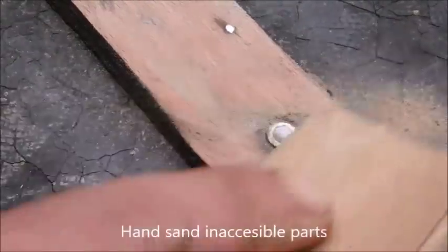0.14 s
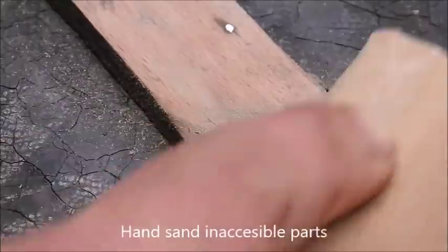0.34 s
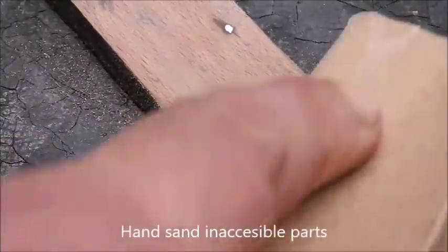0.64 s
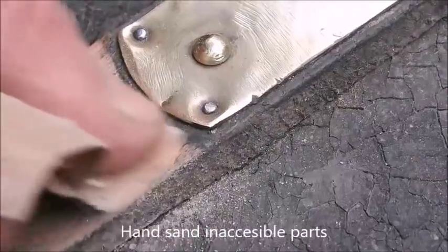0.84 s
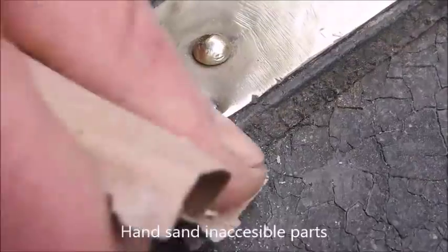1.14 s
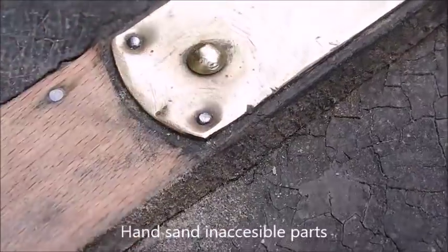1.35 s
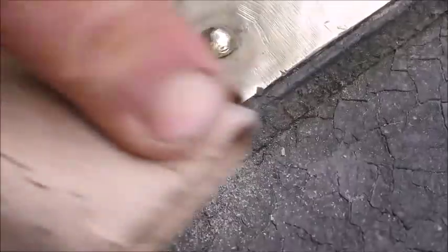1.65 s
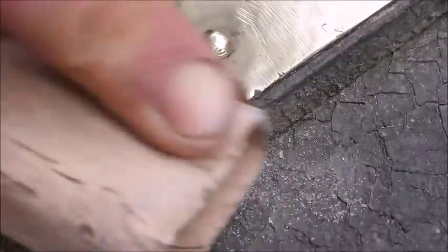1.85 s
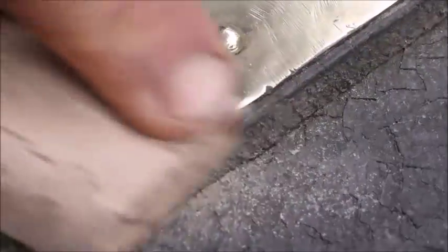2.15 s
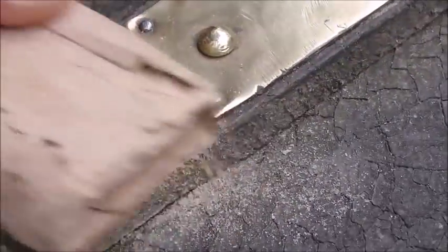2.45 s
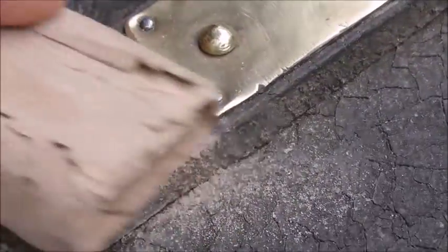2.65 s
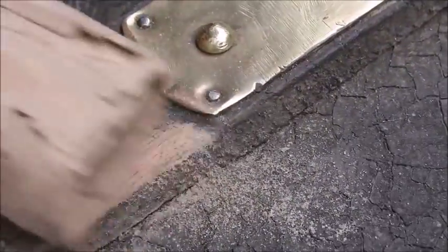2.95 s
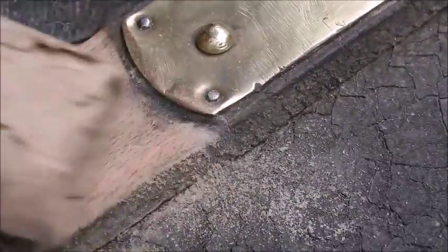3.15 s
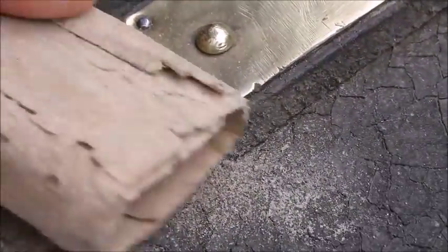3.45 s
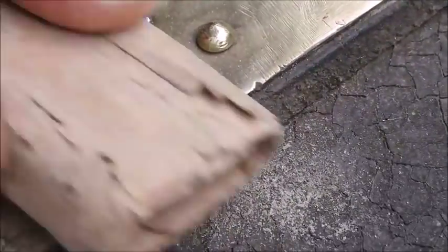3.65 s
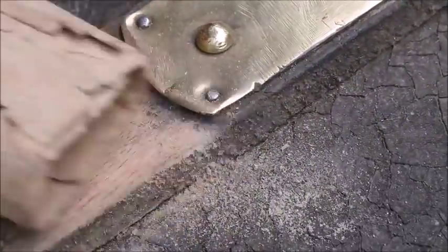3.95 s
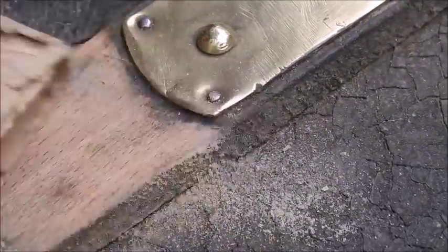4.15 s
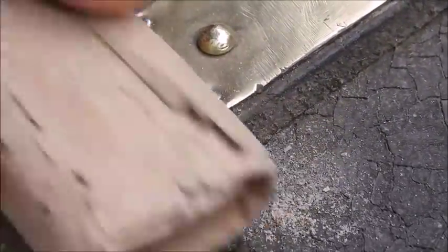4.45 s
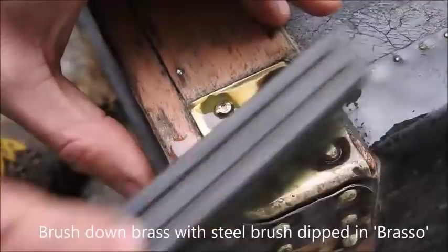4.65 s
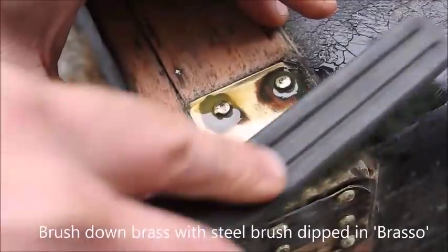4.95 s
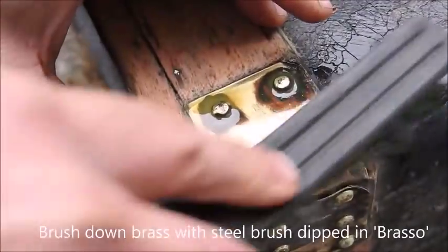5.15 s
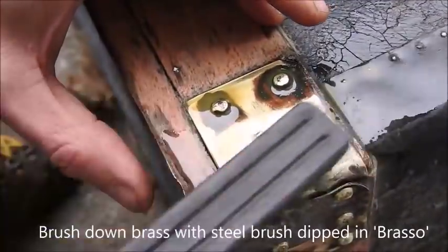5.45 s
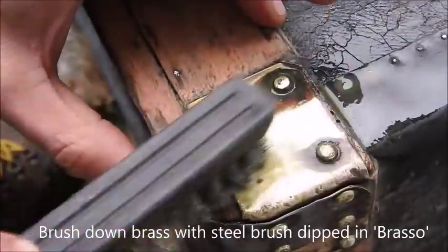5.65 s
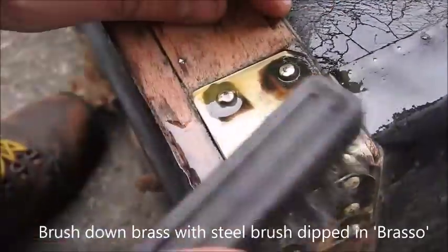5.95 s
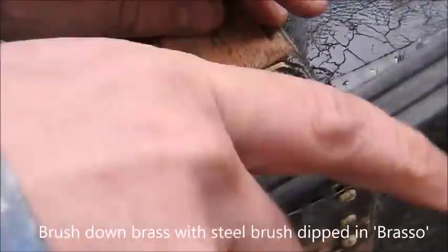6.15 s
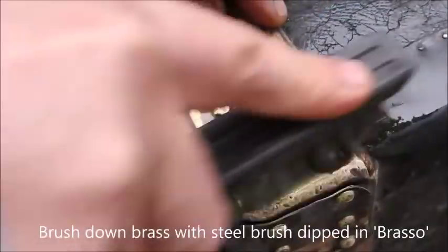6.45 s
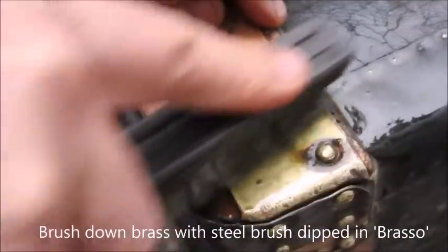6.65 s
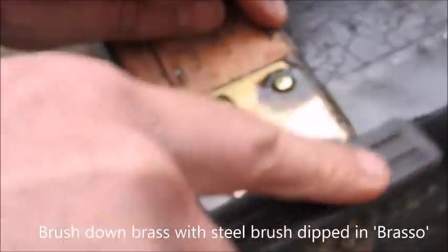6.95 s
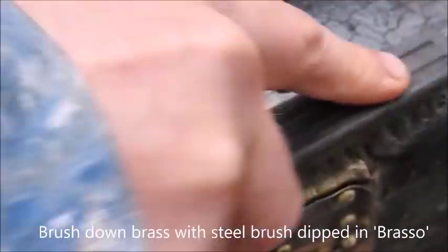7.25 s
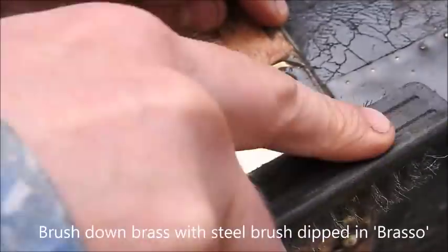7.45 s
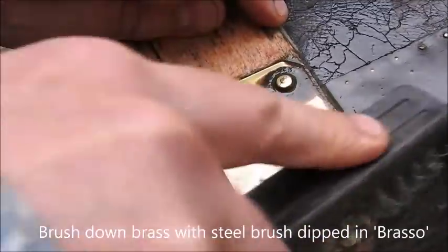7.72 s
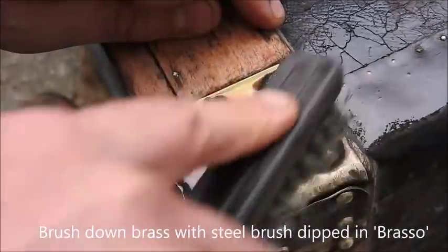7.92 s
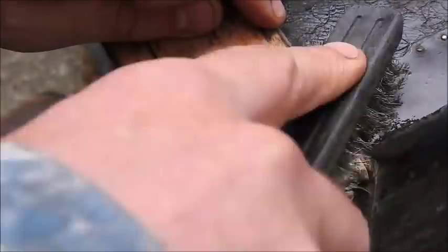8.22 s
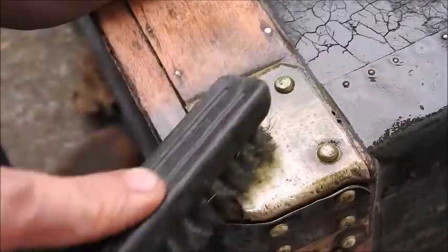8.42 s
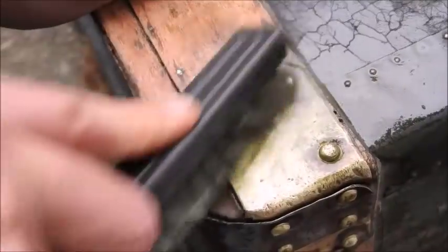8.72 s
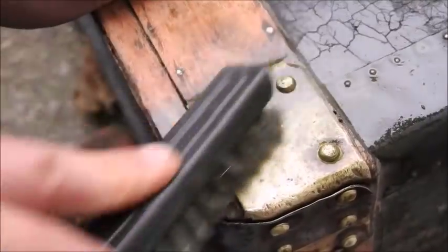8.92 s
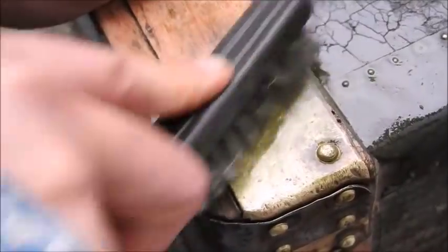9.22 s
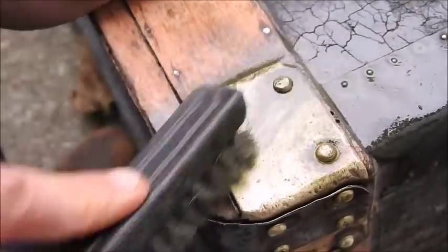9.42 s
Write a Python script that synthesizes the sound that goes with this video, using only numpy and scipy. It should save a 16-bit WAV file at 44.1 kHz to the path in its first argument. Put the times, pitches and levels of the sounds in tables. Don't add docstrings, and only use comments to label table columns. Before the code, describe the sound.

Fast dry sandpaper strokes rasp on hollow wood, with knocks and paper crinkle, then a wet steel brush scrubs brass briskly in a quiet yard.

```python
import sys
import numpy as np
from scipy import signal
from scipy.fft import rfft, irfft, next_fast_len
from scipy.io import wavfile
from scipy.ndimage import uniform_filter1d

SR = 44100
rng = np.random.default_rng(int(sys.argv[2]) if len(sys.argv) > 2 else 0)


def nominal_scale(level):
    x = np.asarray(level, float) / 20
    return 10 ** x


def int16_out(signal):
    q = np.round(np.clip(np.atleast_2d(signal).T, -1, 1) * 32767)
    wavfile.write(sys.argv[1], SR, q.astype(np.int16))


N = 422474
SECONDS = np.arange(N) / SR

SPOTS = [
    0,
    .785,
    1.55,
    2.44,
    4.62,
    5.58,
    6.05,
    8.31,
]
BRUSH_SPOT, EDGE_SPOT = 4, 7


def hand():
    # start in seconds, count of push-and-pull cycles, grit in dB, trunk in dB.
    paper_runs = [(.037, 4, -30.5, -32), (.356, 3, -30.5, -35), (.591, 1, -31.5, -35),
                  (.664, 1, -35, -40.5), (.799, 2, -39.5, -31), (.932, 1, -40.5, -28), (0.997, 2, -40, -30),
                  (1.122, 1, -37, -27), (1.603, 1, -36.5, -41), (1.665, 2, -34.5, -40.5),
                  (1.812, 1, -34, -39.5), (1.886, 1, -36.5, -43), (1.957, 3, -36.5, -40),
                  (2.162, 1, -36.5, -40), (2.456, 1, -35, -40), (2.527, 3, -39.5, -43),
                  (2.734, 2, -37, -40), (2.872, 3, -34, -39.5), (3.068, 1, -36, -39),
                  (3.137, 2, -37.5, -43), (3.273, 2, -36, -37), (3.406, 2, -39.5, -42.5),
                  (3.609, 3, -39.5, -44.5), (3.806, 3, -39.5, -41), (4.006, 1, -40.5, -44.5),
                  (4.077, 2, -38, -40), (4.22, 3, -39.5, -42), (4.422, 2, -37, -42), (4.562, 1, -37, -43.5)]
    # start in seconds, count of cycles, grit in dB.
    brush_runs = [(4.668, 5, -41.5), (4.998, 5, -40), (5.329, 1, -39), (5.393, 2, -39.5), (5.53, 1, -40),
                  (5.59, 1, -40.5), (5.659, 3, -37), (5.856, 1, -35.5), (6.274, 2, -45.5),
                  (6.409, 2, -42.5), (6.546, 1, -41), (6.608, 3, -41.5), (6.811, 2, -41), (6.936, 1, -42.5),
                  (7.159, 1, -41), (7.225, 3, -40), (7.423, 1, -44.5), (7.493, 1, -45), (7.56, 2, -43),
                  (7.695, 3, -44), (7.907, 1, -44), (7.977, 1, -43), (8.047, 2, -44), (8.182, 2, -43.5),
                  (8.361, 2, -39.5), (8.498, 2, -39.5), (8.636, 5, -38.5), (8.99, 2, -37.5),
                  (9.129, 5, -36), (9.494, 1, -37)]
    # start in seconds, grit in dB, place of top speed 0-1, trunk in dB.
    paper_touches = [(0, -33.5, 0, -35.5), (.74, -33.5, 0.94, -34), (.775, -40, .29, -42),
                     (1.184, -35, .63, -25), (1.217, -48, 0.37, -42), (1.241, -53, 0.6, -61),
                     (1.3, -50, 0.3, -35), (1.338, -53, 0.26, -41), (1.376, -52, 0.8, -40),
                     (1.4, -45.5, 0.47, -40.5), (1.44, -53, 0.3, -62), (1.467, -56.5, .27, -72),
                     (1.562, -50.5, 0.3, -64), (2.235, -48, 0.67, -44), (2.283, -48.5, 0.45, -57),
                     (2.324, -57, .46, -60), (2.35, -51, 0.34, -53), (2.411, -53.5, 0.6, -52),
                     (2.438, -53.5, .6, -60), (3.543, -44.5, 0.58, -40.5), (3.566, -60, .5, -57),
                     (3.586, -49, 0.5, -54)]
    # start in seconds, grit in dB, place of top speed 0-1.
    brush_touches = [(4.622, -43, 0.3), (4.636, -44.5, 0.5), (5.929, -69, 0.3), (6.089, -45, 0),
                     (6.115, -53.5, 0.4), (6.219, -54.5, 0.6), (7.008, -49.5, 0.3), (7.037, -62, 0.44),
                     (7.069, -42.5, 0.68), (7.128, -46, 0.44), (8.325, -41, 0.3)]
    # share of the push 0-1, place of top speed in push 0-1 and in pull 0-1,
    # how much softer the pull is in grit dB and in trunk dB.
    gait = [(.49, .56, 0.44, 0.7, 2), (0.48, 0.61, 0.46, 2.5, 11.5), (0.47, 0.63, 0.44, 3, 3.5),
            (0.5, 0.61, 0.47, 1.3, 3.5), (0.59, 0.51, 0.3, 4.5, -2.5), (0.52, 0.56, 0.3, 3, 2),
            (0.54, 0.55, 0.41, 2, 0.1), (0.49, 0.64, 0.45, 2.5, 1.3)]
    uneven_db, uneven_place = 0.65, 0.057

    runs = np.array(paper_runs + [(*row, 0) for row in brush_runs])
    rows = paper_touches + [(*row, 0) for row in brush_touches]
    starts = np.sort([row[0] for row in rows] + list(runs[:, 0]) + [N / SR])
    for s, count, *_ in runs:
        cycle = (starts[starts > s][0] - s) / round(count)
        share, push, pull, grit_loss_db, trunk_loss_db = gait[np.searchsorted(SPOTS, s) - 1]
        for start in s + cycle * np.arange(round(count)):
            grit_db = np.interp(start, runs[:, 0], runs[:, 2])
            trunk_db = np.interp(start, runs[:, 0], runs[:, 3])
            rows.append((start, grit_db, push, trunk_db))
            rows.append((start + share * cycle, grit_db - grit_loss_db, pull, trunk_db - trunk_loss_db))
    rows = np.array(sorted(rows))
    chance = rng.standard_normal(rows.shape) * [0, uneven_db, uneven_place, 1.84 * uneven_db]
    return (rows + chance).T


TURNS, GRIT_DB, PLACE, TRUNK_DB = hand()
TURNS = np.r_[0, TURNS[1:]]
PAPER_STROKES = np.searchsorted(TURNS, SPOTS[BRUSH_SPOT])


def by_tool(paper, brush):
    return np.repeat([paper, brush], [PAPER_STROKES, len(TURNS) - PAPER_STROKES])


def strokes(level_db, turn_db, lean_db, skew, point):
    k = np.searchsorted(TURNS, SECONDS, side="right") - 1
    done = (SECONDS - TURNS[k]) / np.diff(TURNS, append=N / SR)[k]
    top = np.clip(.5 + skew * (PLACE[k] - .5), .08, .92)
    rise_and_fall = np.clip(np.minimum(done / top, (1 - done) / (1 - top)), 0, 1)
    arc = np.sin(np.pi / 2 * rise_and_fall) ** point[k]
    own_stop_db = level_db - turn_db - lean_db * (PLACE - .5)
    stop_db = np.minimum(own_stop_db, np.roll(level_db, 1) - 9.0)
    turn = np.interp(SECONDS, TURNS, nominal_scale(stop_db))
    return turn + (nominal_scale(level_db)[k] - turn) * arc


def at_hz(points, hz):
    return np.interp(np.log(hz + 1), np.log(np.array(points)[:, 0]), np.array(points)[:, 1])


def resonance(x, hz, width):
    r = np.exp(-np.pi * width / SR)
    top = np.array([1, 0, -1]) * (1 - r * r) / 2
    return signal.lfilter(top, [1, -2 * r * np.cos(2 * np.pi * hz / SR), r * r], x, axis=-1)


def decaying(x, t60):
    return signal.lfilter([1], [1, -nominal_scale(-60 / (t60 * SR))], x)


def grains(per_s, spread_db, channels):
    sizes = nominal_scale(spread_db * np.minimum(rng.exponential(1, (channels, N)), 5))
    draw = rng.uniform(-1, 1, (channels, N))
    shower = sizes * np.sign(draw) * (abs(draw) < per_s / SR)
    return shower / shower.std()


def clicks(events):
    out, rows = np.zeros(N), np.array(events)
    out[(rows[:, 0] * SR).astype(int)] = nominal_scale(rows[:, 1])
    return out


def coloured(x, spectrum, tilt_db=0, ripple_db=0):
    size = next_fast_len(x.shape[1])
    hz = np.arange(size // 2 + 1) * SR / size
    ripple = np.interp(hz, np.linspace(0, SR / 2, num=60), rng.standard_normal(60))
    gain = nominal_scale(at_hz(spectrum, hz) + tilt_db * np.log2((hz + 1) / 8000) + ripple_db * ripple)
    gain = gain / np.sqrt(np.mean(gain ** 2 * (hz > 3000) * (hz < 15000)))
    return irfft(rfft(x, size) * gain, size)[:, :x.shape[1]]


def yard():
    # frequency in Hz, density in dB per Hz.
    spectrum = [(140, -13), (290, -1.5), (750, -2.5), (1300, -13.5), (5000, -15.5), (8000, -19),
                (15000, -22)]
    wash = coloured(rng.standard_normal((2, N)), spectrum)
    return nominal_scale(-54.5 - 1.9 * (SECONDS < SPOTS[BRUSH_SPOT])) * wash / wash.std()


def squeak():
    # start in seconds, end in seconds, frequency in Hz, level in dB.
    whistle = (5.668, 5.712, 9370, -38)
    start, end, hz, db = whistle
    swell = np.sin(np.pi * np.clip((SECONDS - start) / (end - start), 0, 1))
    return nominal_scale(db) * swell * np.sin(2 * np.pi * hz * SECONDS) * [[1], [.3]]


def flicks():
    # start in seconds, peak in dB, frequency in Hz, t60 in seconds.
    crinkles = [(1.262, -37.5, 7300, .1), (1.3461, -27, 13200, .015), (1.358, -34, 11000, .015),
                (1.3895, -31, 12400, .025), (1.406, -32, 13000, .02), (1.4144, -24, 14800, .06),
                (1.4768, -36, 12200, .03), (1.4965, -35, 11800, .025), (1.5706, -35, 6750, 0.072),
                (1.576, -34, 13500, .04), (1.613, -29, 11500, 0.045)]
    # time in seconds, peak in dB.
    bristle_flicks = [(4.6924, -40), (4.7624, -30), (4.8189, -29), (4.8853, -27), (4.9506, -34),
                      (5.019, -27), (5.0848, -27), (5.1527, -27), (5.2165, -29), (5.2854, -32),
                      (5.3497, -28), (5.4146, -27), (5.4819, -27), (5.5428, -28)]
    lead_s, width_hz = .007, 1400
    bursts = crinkles + [(s - lead_s, db - .5, 14700, .08) for s, db in bristle_flicks]
    out, t = np.zeros((2, N)), np.arange(SR // 10) / SR
    for s, db, hz, t60 in bursts:
        noise = rng.standard_normal((2, len(t)))
        burst = resonance(resonance(noise, hz, width_hz), hz, 2 * width_hz)
        envelope = nominal_scale(db - 4.0 - 60 * t / t60) * np.minimum(t / t60 / .06, 1)
        out[:, int(s * SR):int(s * SR) + len(t)] += burst / burst.std() * envelope
    return out


def thud():
    # start in seconds, frequency in Hz, t60 in seconds, level in dB.
    drop_rings = [(6.0915, 774, 0.026, -19.5), (6.0915, 974, 0.041, -28), (6.0905, 1230, 0.052, -27),
                  (6.0903, 1564, 0.059, -33.5), (6.0915, 2400, 0.033, -33.5), (6.097, 286, 0.12, -26.5),
                  (6.097, 416, .09, -34), (6.096, 523, 0.078, -29), (6.098, 1990, .1, -43.5),
                  (6.0888, 2020, 0.01, -30), (6.104, 415, .03, -24.5), (6.114, 573, 0.044, -33),
                  (6.132, 390, .05, -38), (6.135, 1500, .08, -51)]
    # start in seconds, frequency in Hz, t60 in seconds,
    # level in dB.
    rap_rings = [(.889, 1440, .05, -30), (.956, 800, .06, -26), (1.019, 1460, 0.053, -20.5),
                 (1.079, 808, .08, -27), (1.08, 1440, 0.051, -29), (1.139, 813, 0.063, -25),
                 (1.203, 820, 0.056, -18), (1.302, 358, .12, -30.5), (1.307, 600, .06, -26.5),
                 (1.308, 1890, 0.032, -28.5), (1.308, 2890, .02, -33), (1.312, 2300, .03, -32),
                 (1.316, 330, .1, -35), (1.347, 704, .05, -30.5), (1.358, 1800, .04, -36),
                 (1.36, 560, 0.065, -35), (1.391, 480, .04, -32), (1.401, 795, 0.037, -33),
                 (1.417, 900, 0.046, -28), (1.419, 421, 0.065, -32)]
    out = np.zeros(N)
    for s, hz, t60, db in drop_rings + rap_rings:
        since = SECONDS - s
        decay = nominal_scale(db - 60 * np.abs(since) / t60)
        out += decay * np.sin(2 * np.pi * hz * np.maximum(since, 0)) * (since > 0)
    return out


def trunk():
    # frequency in Hz, width in Hz.
    modes = [(165, 56), (230, 76), (293, 21.9), (385, 54), (460, 56), (600, 74), (715, 77), (815, 61),
             (1010, 186), (1435, 62), (1950, 260)]
    # one spot, a gain in dB per mode in their order.
    coupling = [(-30, -18.5, -4.5, -2.5, -1, -9, -9.5, -10, -13, -11, -17),
                (-23, -17.5, -7.5, -8.5, -8, -16, -14, -2.5, -12, -4, -14),
                (-18.5, -14.5, 1, -8.5, -14, -12, -14.5, -6.5, -14, -10.5, -22),
                (-20.5, -12.5, 0, -7.5, -13, -9, -12, -6, -13, -6, -18.5),
                (-20, -23, 1.5, -12.5, -6.5, -8, -7, -4, -14.5, -10.5, -24),
                (-21, -20, 0, -11.5, -5, -10, -6, -1, -13.5, -20, -22.5),
                (-19.5, -14.5, 1.5, -13, -7.5, -12, -9.5, -7.5, -16, -12, -20.5),
                (-24, -18.5, 1.5, -13.5, -10, -14.5, -20, -12, -17, -12, -25)]
    # time in seconds, trunk in dB.
    brush_drum = [(4.63, -48), (5.9, -48), (6.3, -45), (6.55, -50), (6.9, -52), (7.35, -47), (7.7, -47),
                  (8.3, -51.5), (9.58, -50.5)]
    # time in seconds, peak in dB, boom in dB.
    knocks = [(0.806, -20.5, -53), (0.821, -20.5, -44), (0.872, -31, -45), (0.889, -20, -40),
              (0.938, -20, -40), (0.956, -17, -35), (1.002, -17, -36), (1.02, -13.5, -45),
              (1.063, -18.5, -38), (1.079, -16, -36), (1.125, -22, -36), (1.139, -13, -39),
              (1.189, -22, -36), (1.203, -12.5, -39), (1.307, -23, -33), (1.346, -32, -39),
              (1.384, -30, -40), (1.405, -24.5, -36), (1.417, -25, -38), (2.19, -20.5, -42),
              (2.265, -27.5, -48), (2.299, -40, -60), (2.359, -29.5, -57), (2.374, -32.5, -56),
              (2.464, -27, -57), (4.176, -28.5, -44)]
    # time in seconds, peak in dB, boom in dB.
    bites = [(1.614, -33, -45), (1.681, -39, -36), (1.759, -30, -37.5), (1.826, -40, -41),
             (1.895, -46, -39), (1.978, -38, -36), (2.031, -36, -33.5), (2.099, -32, -33),
             (2.534, -26.5, -54), (2.602, -27.5, -42), (2.669, -27, -41), (2.741, -34, -39),
             (2.807, -33, -39), (2.876, -36, -38), (2.94, -32, -41), (3.006, -27, -38), (3.074, -32, -38.5),
             (3.141, -26, -38), (3.211, -32, -36), (3.226, -36, -34), (3.277, -37, -33), (3.291, -34, -32),
             (3.344, -39, -33.5), (3.416, -43, -52), (3.482, -29, -41), (3.55, -28, -46),
             (3.617, -31, -38.5), (3.685, -39, -51), (3.752, -47, -41), (3.817, -27.5, -39),
             (3.946, -36, -44), (4.016, -28, -48), (4.081, -39.5, -39), (4.295, -34, -47),
             (4.501, -30, -67), (4.567, -37, -51)]
    # time in seconds, peak in dB.
    slat_slaps = [(0.041, -29), (0.069, -28), (0.118, -23.5), (0.161, -27), (0.2, -26.5), (0.229, -26.5),
                  (0.28, -24), (0.32, -28.5), (0.36, -25.5), (0.399, -31), (0.44, -22.5), (0.477, -27),
                  (0.517, -26.5), (0.554, -26.5), (0.595, -23.5), (0.631, -28.5), (0.669, -22),
                  (0.707, -34), (0.745, -29)]
    low_modes = 5

    brush_db = np.interp(TURNS, *np.transpose(brush_drum)) + 3.3 + 0.65 * (GRIT_DB + 42.5)
    level_db = TRUNK_DB + np.where(by_tool(True, False), 2.0, brush_db)
    level_db = level_db - 6.5 * (TURNS > SPOTS[1]) * (TURNS < 1.45) - 3.0 * (TURNS < SPOTS[1])
    push = strokes(level_db, by_tool(6.6, 7.1), lean_db=11.0, skew=1.0, point=by_tool(1.06, 1.3))
    scrape = grains(per_s=3000, spread_db=1.5, channels=1)[0] * push

    slaps = nominal_scale(22.0) * clicks(slat_slaps)
    hits = np.array(knocks + bites)
    boom = slaps + nominal_scale(32.0) * clicks(hits[:, [0, 2]])
    rap = slaps + nominal_scale(18.5) * clicks(hits)
    boom, rap = scrape + signal.lfilter([.11], [1, -.89], [boom, rap])

    spot = np.searchsorted(SPOTS, SECONDS, side="right") - 1
    stroke = np.searchsorted(TURNS, SECONDS, side="right") - 1
    gains = nominal_scale(coupling)
    gains = gains / np.sqrt(gains ** 2 @ np.array(modes)[:, 1:] * np.pi / SR)
    lie = nominal_scale(1.5 * rng.standard_normal((len(TURNS), len(modes))))
    lie[(TURNS > 2.2) & (TURNS < 2.52), :low_modes] *= nominal_scale(-6.0)
    box = np.zeros(N)
    for k, (hz, width) in enumerate(modes):
        drive = boom if k < low_modes else rap
        box += (-1) ** k * resonance(drive * gains[spot, k] * lie[stroke, k], hz, width)

    rattle = decaying(clicks(hits), 0.045) * rng.standard_normal(N)
    box += nominal_scale(-3.5) * resonance(resonance(rattle, 640, 1130), 1000, 1500)
    box += nominal_scale(-6.0) * resonance(rattle, 1930, 1630)
    return np.array([box, np.roll(box, int(0.036 * SR))])


def rubbing():
    # time in seconds, peak in dB.
    sprays = [(0.0473, -24), (0.1306, -9), (0.162, -15.5), (0.2109, -17), (0.2428, -16), (0.2877, -10.5),
              (0.3217, -21), (0.3696, -23), (0.4055, -24), (0.4484, -12), (0.4843, -24), (0.5287, -16),
              (0.605, -19), (0.6355, -14), (0.68, -11), (0.7567, -19), (4.3114, -11), (4.5131, -22),
              (4.583, -19), (4.6894, -28), (4.7644, -31), (4.8189, -27), (4.8838, -24), (4.9494, -34),
              (5.0185, -30), (5.0848, -29), (5.1522, -24), (5.2165, -28), (5.2854, -39), (5.3497, -27),
              (5.4146, -23), (5.4814, -25), (5.5474, -37), (5.6072, -24), (5.6735, -25), (5.878, -14),
              (5.899, -21), (7.1736, -26), (7.2444, -17), (8.3729, -26), (8.4422, -35), (8.516, -23),
              (8.6852, -25), (8.7171, -26), (8.8947, -18), (8.964, -22), (9.2913, -31), (9.3616, -25),
              (9.4379, -34)]
    # time in seconds,
    # peak in dB.
    snaps = [(1.3468, -26), (1.5874, -30), (2.24, -30), (2.268, -27), (2.306, -29), (6.0905, -41),
             (6.097, -24), (6.592, -19.5), (7.2675, -26), (8.8558, -24), (9.1775, -22), (5.2165, -23),
             (1.307, -33)]
    # time in seconds, peak in dB.
    ticks = [(0.1306, -17), (0.3217, -20), (0.4484, -16), (0.5287, -18), (1.0725, -21), (2.1021, -25),
             (2.172, -24), (2.8779, -21), (3.2859, -20)]

    level_db = GRIT_DB + by_tool(2.13, 1.44) - 3.1 * (GRIT_DB < -54)
    edge = TURNS > SPOTS[EDGE_SPOT]
    turn_db, point = by_tool(24.2, 7.7) + 5.1 * edge, by_tool(1.24, 2.06) - 0.84 * edge
    speed = strokes(level_db - 1.0 * edge, turn_db, lean_db=28, skew=2.15, point=point)
    shower = grains(per_s=21000, spread_db=3.0, channels=2)

    wet = (SECONDS > SPOTS[BRUSH_SPOT]) * (SECONDS < SPOTS[EDGE_SPOT])
    drag = 0.3 * (uniform_filter1d(speed, int(.066 * SR)) - speed) * wet
    dragging = signal.lfilter(*signal.butter(2, 5500, fs=SR), shower * drag)

    at_corner = (SECONDS > SPOTS[BRUSH_SPOT]) * (SECONDS < SPOTS[BRUSH_SPOT + 1])
    spray = decaying(clicks(sprays), 0.023) * nominal_scale(-20.5 + 2.4 * at_corner)
    spraying = signal.lfilter([1, -.55], [1], shower * spray)
    snapping = (clicks(snaps) + clicks(ticks) * nominal_scale(0.5)) * nominal_scale(5.0) * [[1], [.4]]
    return shower * speed + spraying + dragging + snapping


def grit():
    # frequency in Hz, density in dB per Hz.
    slat = [(940, -16), (1900, -6), (2510, -10), (5000, -7), (6240, -0.5), (7630, -6), (9980, -1),
            (15800, -7)]
    rivets = [(1530, -39), (2600, -5), (6530, -7), (8640, -10.5), (10900, -6), (15800, -9)]
    corner = [(1060, -29), (1800, -8.5), (2660, -1.5), (3720, -6.5), (4270, -2), (6970, -5), (10200, -1),
              (15800, -5)]
    border = [(1150, -26), (2500, -2), (3700, -6), (6900, -4), (7700, -1.5), (10900, -2), (11500, -7.5),
              (15800, -9.5)]
    wet_corner = [(1000, -36), (1700, -17.5), (3500, -11), (5000, -13), (6500, -10), (7280, -6),
                  (10600, -7), (14900, -8)]
    plate = [(880, -31), (1500, -5.5), (1790, -15), (4220, -8.5), (4700, -11), (8660, -3), (15800, -8)]
    face = [(880, -33), (1500, -3.5), (1950, -15.5), (3000, -6.5), (4750, -10.5), (8500, -5), (10600, -6.5),
            (15600, -5.5)]
    edge = [(880, -37), (1500, -9.5), (2600, -11), (3200, -7.5), (6000, -4), (9400, -5), (10500, -6.5),
            (15800, -9.5)]
    # frequency in Hz, width in Hz, level in dB at the wet corner, on the face, at the edge.
    brass = [(4400, 170, -4, 2.5, -18), (5690, 130, -1, 1, -4), (7230, 120, 2.5, -2, -8),
             (7900, 60, 1, 7.5, -13), (8600, 280, -4.5, -4, -18), (9460, 91, -12, -4, 5.5),
             (10000, 150, -3, -4, -12), (11650, 300, -7, -2.5, 2), (13100, 200, -17, -10, -6),
             (13400, 2300, -30, -28, -5), (14600, 340, -11, -12, -19), (15100, 190, -4, -11, -14)]
    # frequency in Hz, width in Hz, depth 0-1 at the wet corner,
    # on the face, at the edge.
    shadows = [(4750, 400, 0.8, .75, 0.11), (10500, 700, 0.3, .2, 0.4)]
    sideways = [-.05, .3, .2, .1, 0.01, -.05, -0.012, 0.035]

    spectra = [slat, rivets, corner, border, wet_corner, plate, face, edge]
    rub = rubbing()
    bounds = np.append(np.ceil(TURNS * SR), N).astype(int)
    spot = np.searchsorted(SPOTS, TURNS + .015) - 1
    tilt_db = by_tool(0.76, 7.4) * (PLACE - .5)
    pieces = []
    for start, end, k, tilt in zip(bounds, bounds[1:], spot, tilt_db):
        pieces.append(coloured(rub[:, start:end], spectra[k], tilt, ripple_db=2.5))
    out = np.hstack(pieces)

    brush_on = bounds[PAPER_STROKES]
    brushed = out[:, brush_on:]
    lie = np.searchsorted(SPOTS[6:], np.arange(brush_on, N) / SR)
    brushed += sum(nominal_scale(np.array(db))[lie] * resonance(brushed, hz, width) for hz, width, *db in brass)
    for hz, width, *depth in shadows:
        brushed -= np.array(depth)[lie] * resonance(brushed, hz, width)

    slat_end = bounds[np.searchsorted(spot, 1)]
    out[:, :slat_end] -= 0.54 * resonance(out[:, :slat_end], 2560, 250)
    out[1] += np.repeat(np.array(sideways)[spot], np.diff(bounds)) * out[0]
    return out


def scene():
    # frequency in Hz, left-right likeness 0-1.
    likeness = [(140, .86), (260, .97), (1500, .972), (2400, .91), (6000, .6), (15000, .56)]
    # frequency in Hz, left minus right in dB.
    lean = [(2000, 0), (4000, -2), (8000, -3.6), (15000, -1.5)]
    size = next_fast_len(N)
    mix = yard() + squeak() + flicks() + thud() * [[1], [.3]] + trunk() + grit()
    mid, side = rfft(mix, size)
    hz = np.arange(size // 2 + 1) * SR / size
    alike = np.clip(at_hz(likeness, hz), 0, .999)
    half_lean_db = at_hz(lean, hz) / 2
    side = side * np.sqrt((1 - alike) / (1 + alike))
    return irfft([(mid + side) * nominal_scale(half_lean_db), (mid - side) * nominal_scale(-half_lean_db)], size)[:, :N]


def top_cut(x):
    return signal.sosfilt(signal.butter(12, 16530, fs=SR, output="sos"), x)


def record(dry):
    thin = signal.sosfilt(signal.butter(3, 205, "high", fs=SR, output="sos"), dry)
    gusts_db = np.interp(np.arange(N), np.linspace(0, N, num=40), rng.standard_normal(40))
    rumble_db = -56.5 + 3.5 * gusts_db + 3.4 * (SECONDS < SPOTS[BRUSH_SPOT])
    noise = rng.standard_normal(N) + 0.27 * rng.standard_normal((2, N))
    rumble = nominal_scale(rumble_db) * signal.lfilter([.03], [1, -.97], noise)
    cut = signal.sosfilt(signal.cheby2(20, 55, 15920, fs=SR, output="sos"), thin + rumble)
    return top_cut(cut)


dry = scene()
out = record(dry)
int16_out(out)
```